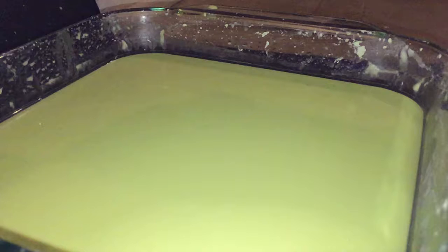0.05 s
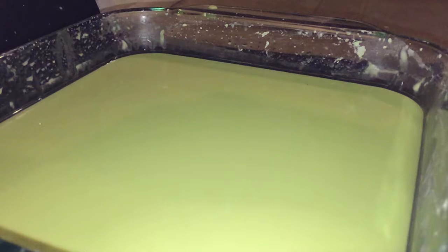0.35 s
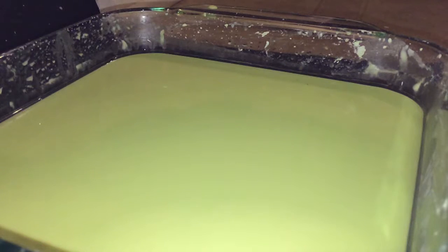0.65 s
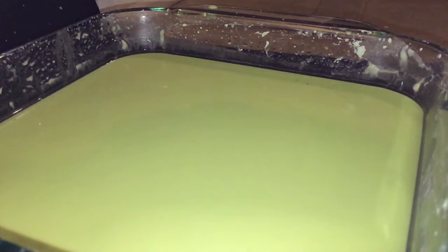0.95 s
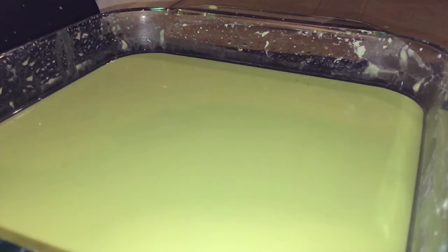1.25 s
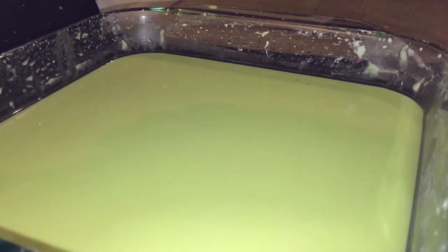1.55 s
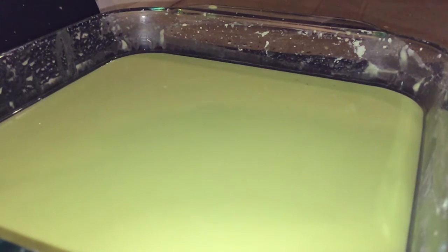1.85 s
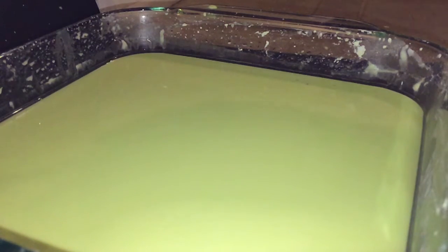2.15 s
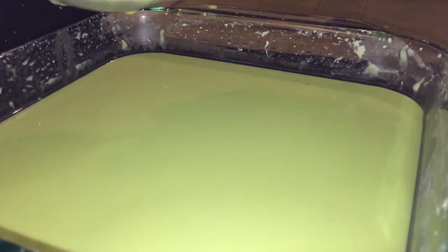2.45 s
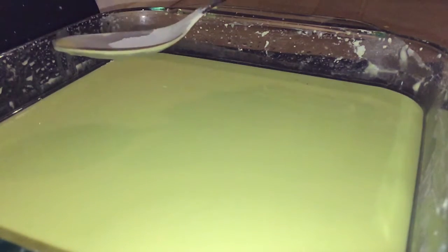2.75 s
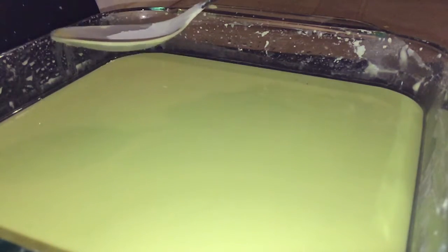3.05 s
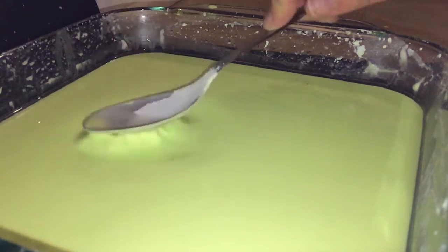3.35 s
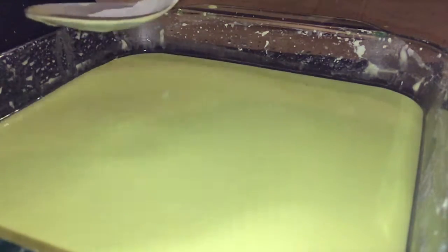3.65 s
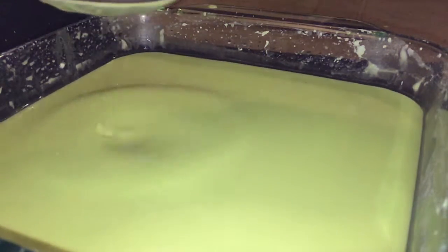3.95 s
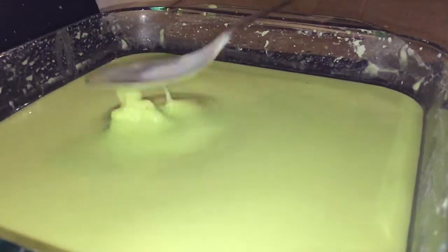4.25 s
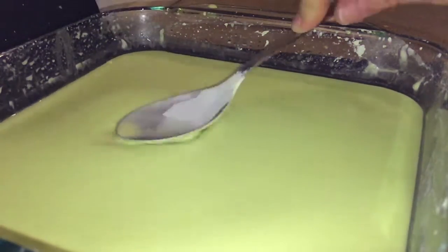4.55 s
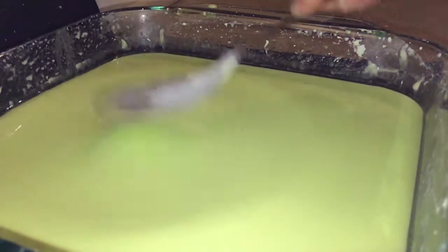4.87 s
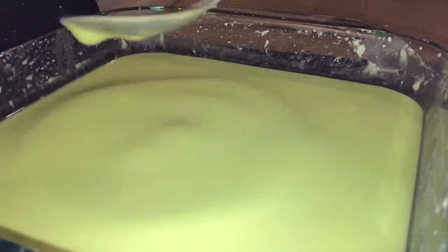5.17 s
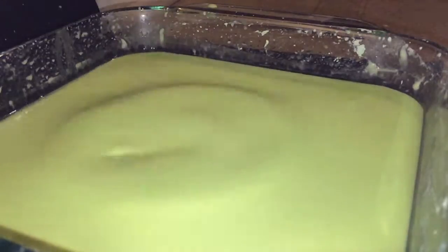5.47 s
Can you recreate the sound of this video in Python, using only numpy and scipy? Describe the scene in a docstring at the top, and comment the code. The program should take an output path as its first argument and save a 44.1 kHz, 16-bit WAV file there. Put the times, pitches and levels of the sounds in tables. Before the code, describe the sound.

In a small room, only a low appliance hum and a soft hiss are heard at first. Then, close to the microphone, a metal spoon smacks the surface of a thick fluid in a metal tray. Seven short wet slaps build in force and pace, some popping and ringing briefly, others mostly cracking. Between the later ones come very faint sticky snaps as the spoon lifts, and one dull tick of a falling drop.

```python
"""An appliance hums, slowly beating, over the soft rumble of a small room. Then a metal spoon slaps a thick
starch fluid in a roasting tray seven times, growing harder and quicker. The fluid stiffens under each blow:
a wet crack, a pop of trapped air, a thud, a short ring of spoon and tray. The spoon's bowl pops and rings
when it lands nearly flat and mostly cracks when it lands on its edge. About a tenth of a second after four
of the slaps the spoon peels off with a faint sticky tick; once a drop falls back."""
import sys
import numpy as np
from scipy import signal
from scipy.fft import rfft, irfft, next_fast_len
from scipy.io import wavfile

SR = 44100
rng = np.random.default_rng(int(sys.argv[2]) if len(sys.argv) > 2 else 0)


def store_pcm(level_fs):
    """Save levels as 16-bit WAV."""
    pcm = np.round(np.clip(level_fs, -1, 1) * 32767).astype(np.int16)
    wavfile.write(sys.argv[1], SR, np.atleast_2d(pcm).T)


N = 251811
TIME = np.arange(N) / SR

# motor and mains tones, lowest first: f/Hz, rms level before beating and wavering/dB
HUM_TONES = [(58.6, -57), (118.4, -53), (161.5, -55.5), (323.0, -68)]
# spectrum of the room's rumble and hiss: f/Hz, relative level/dB
NOISE_SPECTRUM = [(20, -45), (40, -18.5), (65, -8), (90, -4), (120, -1.5), (180, -2.5), (280, -14),
                  (420, -19.5), (600, -27), (1070, -29.5), (2400, -36), (3200, -42.5), (6000, -44),
                  (7500, -47), (15500, -52.5)]
# room resonances heard in that noise: f/Hz, bandwidth/Hz, relative level/dB
ROOM_MODES = [(117.2, 32, -57), (165.4, 19.5, -56.5), (236.4, 23.6, -63), (315.7, 29.7, -60),
              (366.1, 14.2, -65), (481, 13, -71.5), (612, 32.6, -70), (684, 20.3, -72), (831, 195, -69),
              (1437, 160, -80)]
# blows of the spoon: t/s, strength/dB, tilt of the bowl (0 flat, 1 edge first), push through to the tray/dB
BLOWS = [(3.3911, -32, 0.099, -16), (3.8678, -22, 0.16, -3), (4.2690, -13, 0.059, 1),
         (4.6627, -14.5, 1, -2.5), (5.0002, -10, 0.206, -8), (5.3474, -7, 0.78, -5),
         (5.6255, -8, 0.39, -1.5)]
# spectrum of the wet crack: f/Hz, relative level/dB
CRACK_SPECTRUM = [(200, -20), (700, 17), (1100, -21), (2000, 11), (2700, -3), (3300, -5.5), (4500, 6),
                  (5600, 1), (7000, -0.5), (9000, 2), (10500, 0), (13000, 3), (16000, -10)]
# resonances of the gap under the bowl: f/Hz, level against the crack for a flat bowl/dB
GAP_MODES = [(4500, -20), (5550, -11.5)]
# modes of the spoon and of the tray, damped by the fluid: f/Hz, relative level/dB, T60/s
SPOON_MODES = [(1519, 1.5, 0.095), (1445, -2.5, 0.055), (1710, -11.5, 0.11), (2100, -24, 0.12)]
TRAY_MODES = [(307.4, -20.5, 1), (459, 2, 0.037), (766.6, -2, 0.19), (872, -13.5, 0.32), (1154, -3, 0.077)]
# tiny bubbles pinched off by a slap: t/s, level/dB
PINCHED_BUBBLES = [(3.3914, -36), (5.0007, -7)]
# spectrum of the reverberation: f/Hz, relative level/dB
REVERB_SPECTRUM = [(150, -17), (750, -7), (1500, 1.5), (2200, -10.5), (3000, -4.5), (6000, -4.5),
                   (15000, -11)]
# the spoon peels off the fluid: t/s, level of the snap/dB
PEEL_SNAPS = [(4.341, -59), (4.772, -67), (5.106, -58), (5.434, -62.5)]
# a drop falls back: t/s, relative level/dB
FALLING_DROPS = [(5.423, -50)]

FIRM_DB = -10   # strength of a firm slap, the reference for pocket pitch and thud level
CUTOFF_HZ = 15400


def from_db(db):
    """Amplitude ratio of a level in decibels."""
    return 10 ** (np.asarray(db) / 20)


def unit_rms(x):
    """Normalise to a mean power of one."""
    return x / np.sqrt(np.mean(x ** 2) + 1e-20)


def unit_energy(x):
    """Normalise to the energy of a unit impulse."""
    return x / np.sqrt(np.sum(x ** 2) + 1e-20)


def add(track, onset_s, sound):
    """Superposition: a sound adds to the track from its onset on."""
    start = int(round(onset_s * SR))
    track[start:start + len(sound)] += sound[:N - start]


def coloured(x, spectrum):
    """Minimum-phase filtering: folding the cepstrum gives a causal response with the given spectrum."""
    size = next_fast_len(2 * len(x))
    hz, db = np.transpose(spectrum)
    grid_hz = np.maximum(np.arange(size // 2 + 1) * SR / size, 1)
    gain = from_db(np.interp(np.log(grid_hz), np.log(hz), db))
    cepstrum = irfft(np.log(gain), size)
    cepstrum[1:size // 2] *= 2
    cepstrum[size // 2 + 1:] = 0
    return irfft(rfft(x, size) * np.exp(rfft(cepstrum)), size)[:len(x)]


def band(x, low_hz, high_hz):
    """Butterworth band-pass with gentle slopes."""
    return signal.sosfilt(signal.butter(2, [low_hz, high_hz], "band", fs=SR, output="sos"), x)


def narrow_noise(hz, width_hz):
    """Random excitation of one resonance; rms 1."""
    return unit_rms(band(rng.standard_normal(N), hz - width_hz / 2, hz + width_hz / 2))


def ring(hz, t60, rise_s):
    """A damped oscillator builds up while it is driven and falls by 60 dB in t60 seconds."""
    t = TIME[:SR // 2]
    return np.sin(2 * np.pi * hz * t) * from_db(-60 * t / t60) * (1 - np.exp(-t / rise_s))


def appliance(beat_period_s, beat_crest_s, beat_depth, waver, waver_hz):
    """Interference: two motors almost in step make the lowest tone beat. The higher tones waver."""
    (low_hz, low_db), *upper_tones = HUM_TONES
    beat = np.abs(1 + beat_depth * np.exp(2j * np.pi * (TIME - beat_crest_s) / beat_period_s))
    out = from_db(low_db) * beat * np.sqrt(2) * np.sin(2 * np.pi * low_hz * TIME)
    for hz, db in upper_tones:
        tone = np.sqrt(2) * np.sin(2 * np.pi * (hz * TIME + rng.random()))
        out += from_db(db) * (tone + waver * narrow_noise(hz, waver_hz))
    return out


def room_noise(broadband_db, mode_gain_db, flutter_db, flutter_hz):
    """Resonance: the room's modes lift narrow, slightly fluttering bands out of a soft rumble and hiss."""
    out = from_db(broadband_db) * unit_rms(coloured(rng.standard_normal(N), NOISE_SPECTRUM))
    for hz, width_hz, db in ROOM_MODES:
        flutter = np.interp(TIME * flutter_hz, np.arange(100), rng.standard_normal(100))
        out += from_db(db + mode_gain_db + flutter_db * flutter) * narrow_noise(hz, width_hz)
    return out


def crack(snap_db, squeeze_s, spray_db, spray_t60, mist_db, mist_t60, low_hz):
    """Squeeze flow: contact snaps, the film under the bowl bursts out, and a fine hiss dies away."""
    t = TIME[:SR // 3]
    burst, mist = band(rng.standard_normal((2, len(t))), low_hz, CUTOFF_HZ)
    burst *= np.exp(-(t / squeeze_s) ** 4) + from_db(spray_db - 60 * t / spray_t60)
    mist *= from_db(-60 * t / mist_t60)
    wet = unit_energy(burst) + from_db(mist_db) * unit_energy(mist)
    snap = unit_energy(np.array([-.3, .5, 1, -.2, -.4]))
    add(wet, 0.0002, from_db(snap_db) * snap)
    return coloured(unit_energy(wet), CRACK_SPECTRUM)


def air_pocket(strength_db, tilt, t60, wash_db, wash_t60):
    """Cavity resonance: trapped air pops and leaves a soft wash; a harder slap traps a larger, lower pocket."""
    hz = 2474 - 9 * (strength_db - FIRM_DB)
    scoop_db = 14.5 * np.exp(-((tilt - 0.28) / 0.16) ** 2)   # a slight tilt scoops the most air
    t = TIME[:SR // 2]
    wash = unit_rms(band(rng.standard_normal(len(t)), low_hz=1980, high_hz=2540))
    wash *= (1 - np.exp(-t / t60)) * from_db(wash_db - 60 * t / wash_t60)
    return from_db(strength_db - 18 + scoop_db) * (ring(hz, t60, rise_s=0.00065) + wash)


def thud(strength_db, firm_level_db, growth):
    """Shear thickening: the mass of fluid stiffens, so its thud grows more slowly than the blow."""
    level_db = firm_level_db + growth * (strength_db - FIRM_DB)
    return from_db(level_db) * ring(hz=210, t60=0.019, rise_s=0.0014)


def struck_metal(modes, level_db):
    """Modal vibration: each landing excites the modes a little differently, by about 1 dB."""
    return sum(from_db(level_db + db + rng.standard_normal()) * ring(hz, t60, rise_s=0.0015)
               for hz, db, t60 in modes)


def slaps(sink_s, spoon_db, tray_db, edge_gap_gain_db, edge_spoon_loss_db):
    """Impact excitation: crack and gap sound at contact; air, fluid, spoon and tray as the bowl sinks in."""
    out = np.zeros(N)
    for onset_s, strength_db, tilt, push_db in BLOWS:
        wet = crack(snap_db=-6, squeeze_s=0.0021, spray_db=-7, spray_t60=0.021,
                    mist_db=-15.5, mist_t60=0.17, low_hz=2700)
        add(out, onset_s, from_db(strength_db) * wet)
        for hz, gap_db in GAP_MODES:
            gap = unit_energy(ring(hz, t60=0.0097, rise_s=0.0013))
            add(out, onset_s, from_db(strength_db + gap_db + edge_gap_gain_db * tilt) * gap)
        pop = air_pocket(strength_db, tilt, t60=0.013, wash_db=-26.5, wash_t60=0.19)
        fluid = thud(strength_db, firm_level_db=-23, growth=0.47)
        spoon = struck_metal(SPOON_MODES, strength_db + spoon_db - edge_spoon_loss_db * tilt)
        tray = struck_metal(TRAY_MODES, strength_db + tray_db + push_db)
        add(out, onset_s + sink_s, pop + fluid + spoon + tray)
    return out


def bubbles(hz, t60):
    """Volume pulsation: a tiny pinched-off bubble gives a very high, very short ping."""
    out = np.zeros(N)
    for onset_s, db in PINCHED_BUBBLES:
        add(out, onset_s, from_db(db) * unit_energy(ring(hz, t60, rise_s=0.00033)))
    return out


def reverberation(x, first_echo_s, t60, gain_db):
    """Diffuse reflection: dense echoes from near walls decay exponentially."""
    t = TIME[:SR // 2]
    tail = rng.standard_normal(len(t)) * from_db(-60 * t / t60) * (t > first_echo_s)
    response = coloured(unit_energy(tail), REVERB_SPECTRUM)
    return from_db(gain_db) * signal.fftconvolve(x, response)[:N]


def fizz(swell_s):
    """Amplitude modulation: fine grains of noise swell to an rms of one and fade."""
    t = TIME[:SR // 12]
    grains = rng.standard_normal(len(t)) * rng.random(len(t)) ** 2
    envelope = t / swell_s * np.exp(1 - t / swell_s)
    return envelope * unit_rms(band(grains, low_hz=5160, high_hz=14000))


def peels(stretch_lead_s, stretch_db):
    """Rupture under tension: as the spoon lifts, threads of fluid stretch with a soft fizz, then snap."""
    out = np.zeros(N)
    for snap_s, db in PEEL_SNAPS:
        add(out, snap_s - stretch_lead_s, from_db(db + stretch_db) * fizz(swell_s=0.016))
        add(out, snap_s, from_db(db) * fizz(swell_s=0.004))
    return out


def drops(gain_db):
    """The impact of a falling drop is a band-limited impulse: one dull tick."""
    impulses = np.zeros(N)
    for onset_s, db in FALLING_DROPS:
        add(impulses, onset_s, from_db([db + gain_db]))
    return band(impulses, low_hz=600, high_hz=4440)


def scene():
    """Superposition of the direct slaps and splatter, their reverberation and the steady background."""
    direct = slaps(sink_s=0.00028, spoon_db=-16.5, tray_db=-24.5,
                   edge_gap_gain_db=3, edge_spoon_loss_db=19)
    direct += bubbles(hz=13440, t60=0.0011)
    direct += peels(stretch_lead_s=0.03, stretch_db=-8.5)
    direct += drops(gain_db=21)
    hum = appliance(beat_period_s=4.84, beat_crest_s=3.45, beat_depth=0.89, waver=0.34, waver_hz=9.3)
    noise = room_noise(broadband_db=-52, mode_gain_db=-1, flutter_db=1.5, flutter_hz=12)
    echoes = reverberation(direct, first_echo_s=0.0064, t60=0.36, gain_db=-17)
    return (hum + noise + direct + echoes)[None]


def record(dry):
    """Gating and band limiting: the microphone opens after 0.12 s, and a steep low-pass cuts the top."""
    opened = np.clip((TIME - 0.12) / 0.0038, 0, 1)
    low_pass = signal.ellip(10, .2, 80, CUTOFF_HZ, fs=SR, output="sos")
    return signal.sosfilt(low_pass, dry * opened)


dry = scene()
out = record(dry)
store_pcm(out)
```